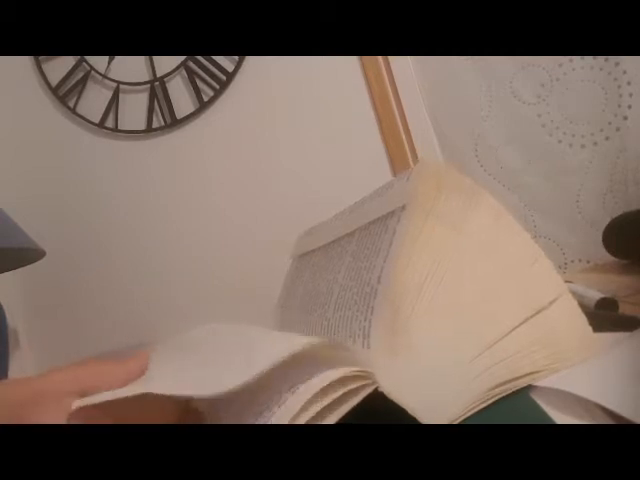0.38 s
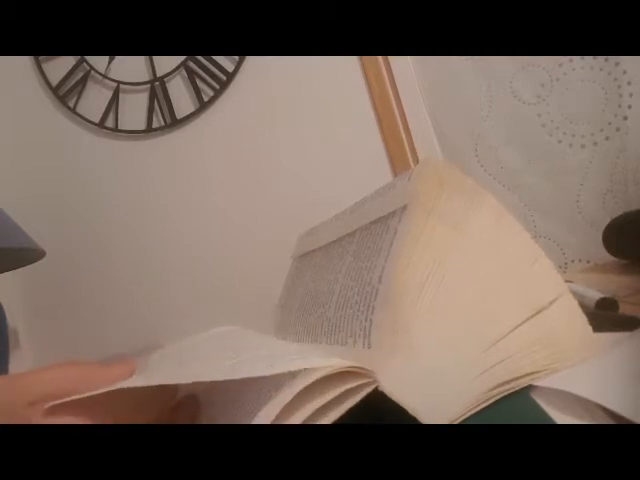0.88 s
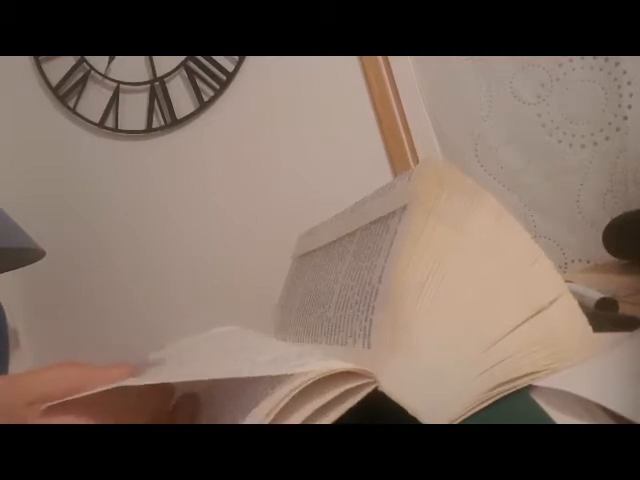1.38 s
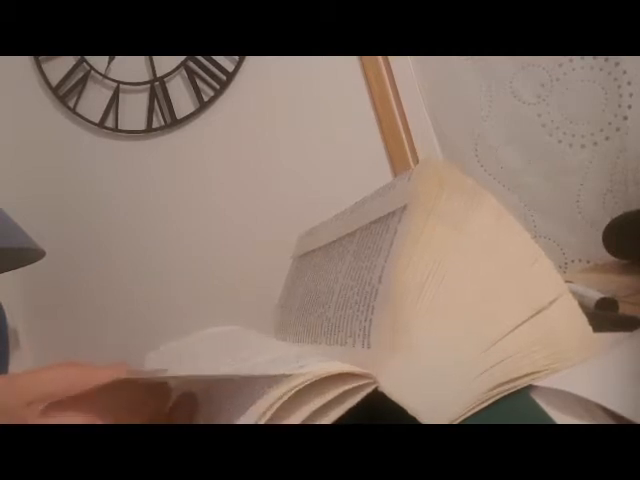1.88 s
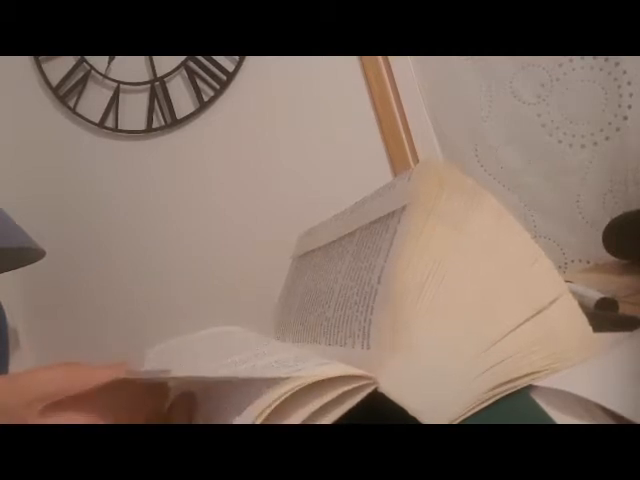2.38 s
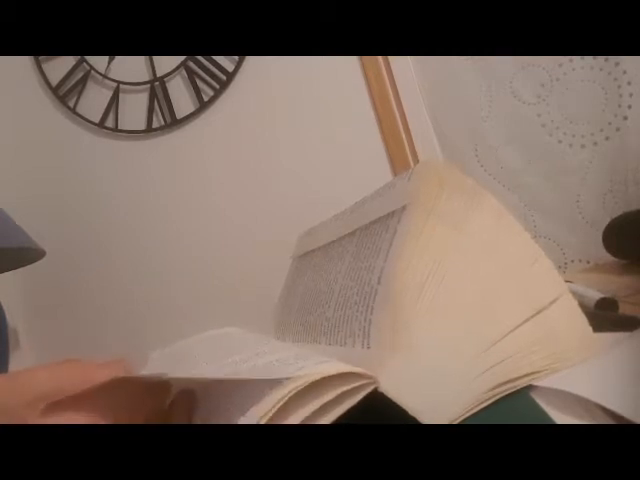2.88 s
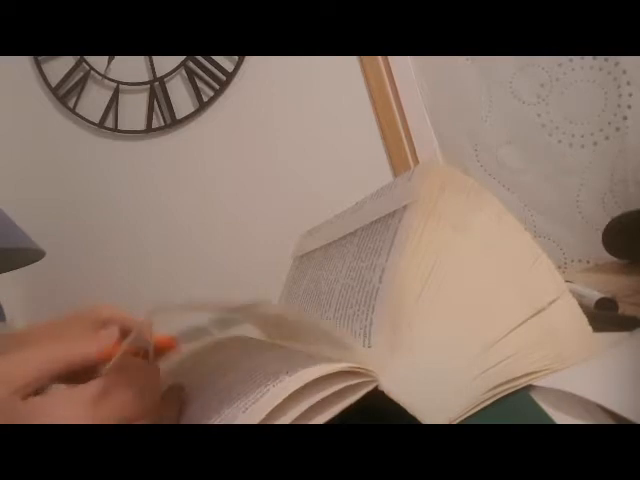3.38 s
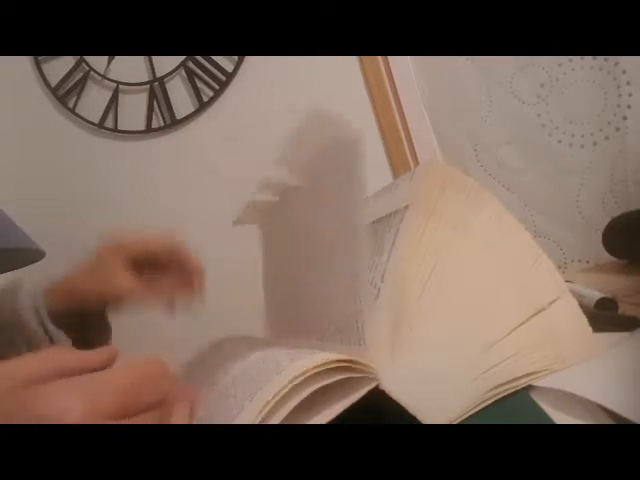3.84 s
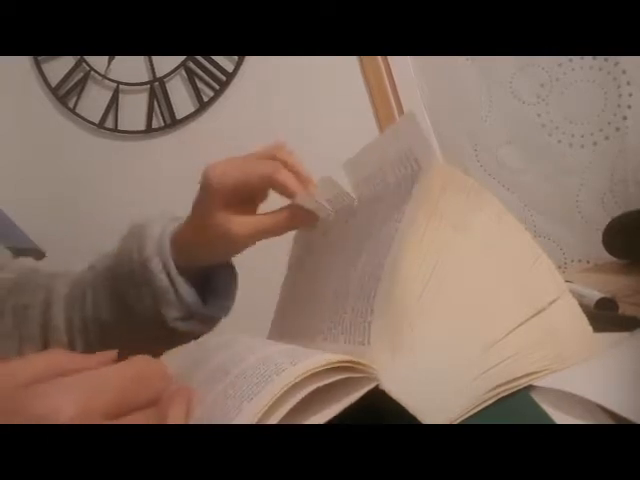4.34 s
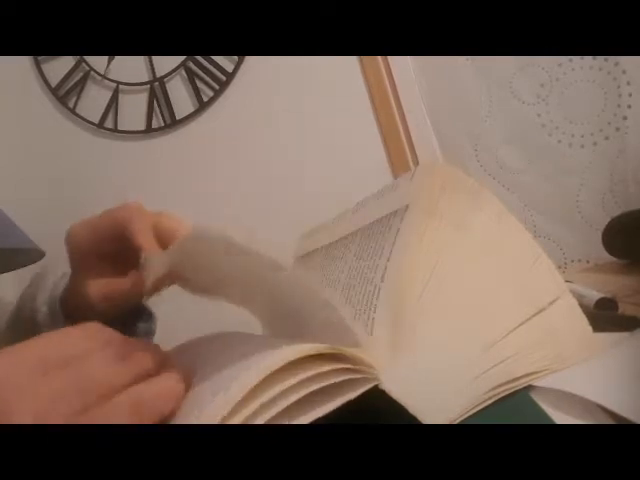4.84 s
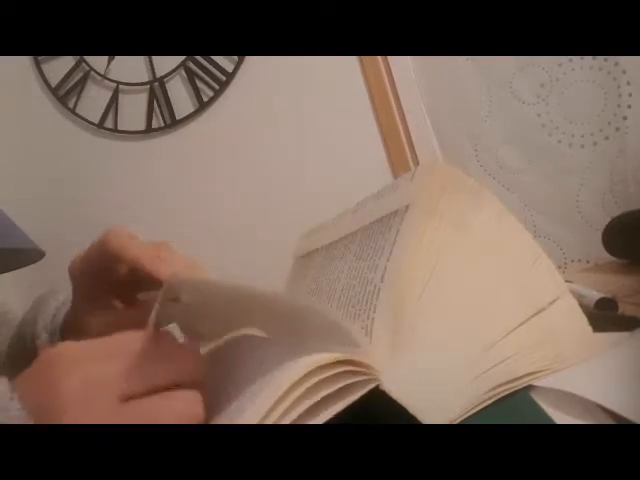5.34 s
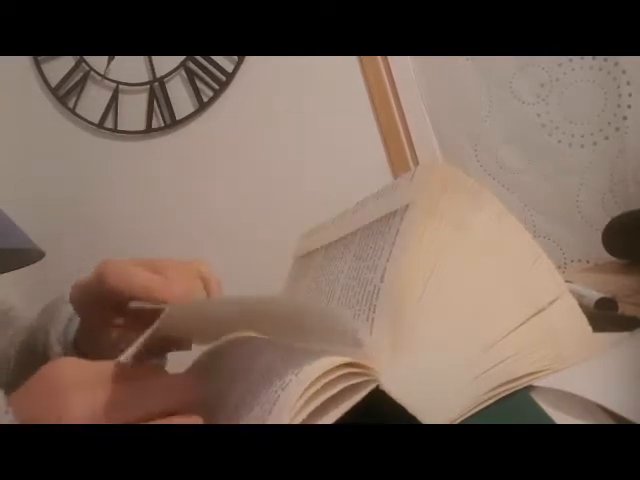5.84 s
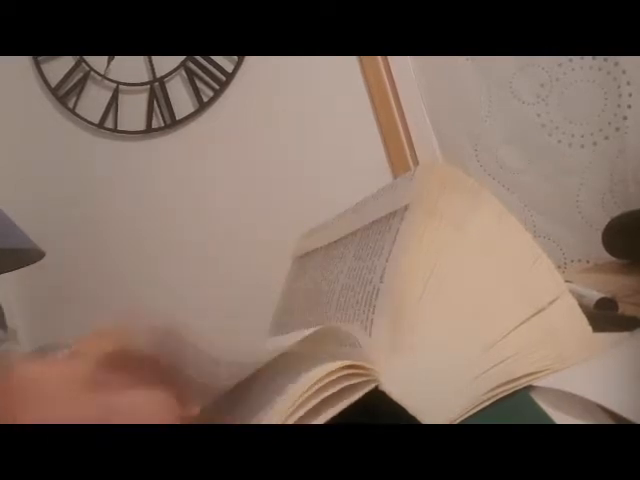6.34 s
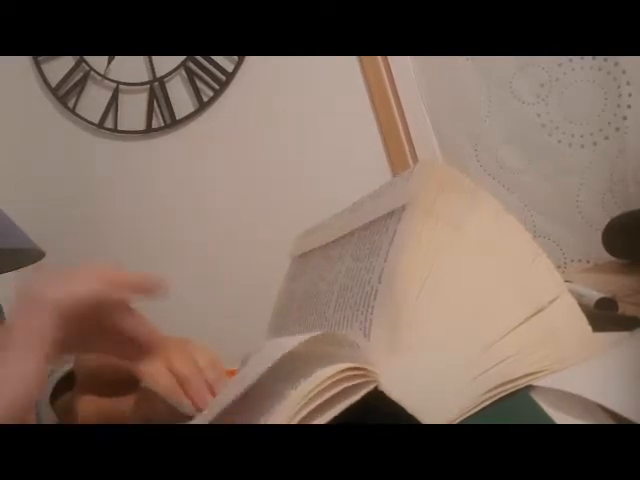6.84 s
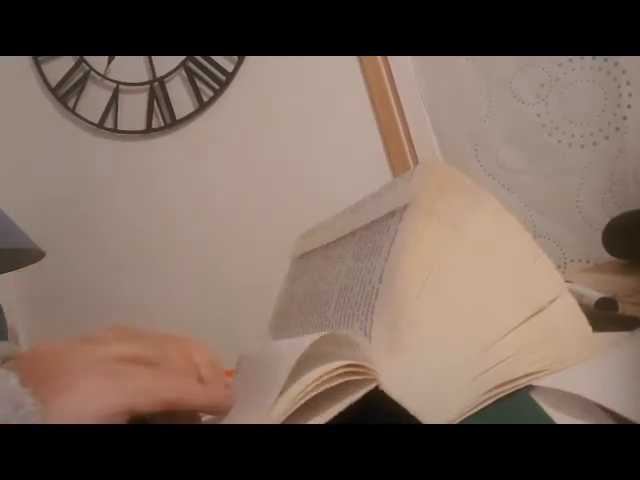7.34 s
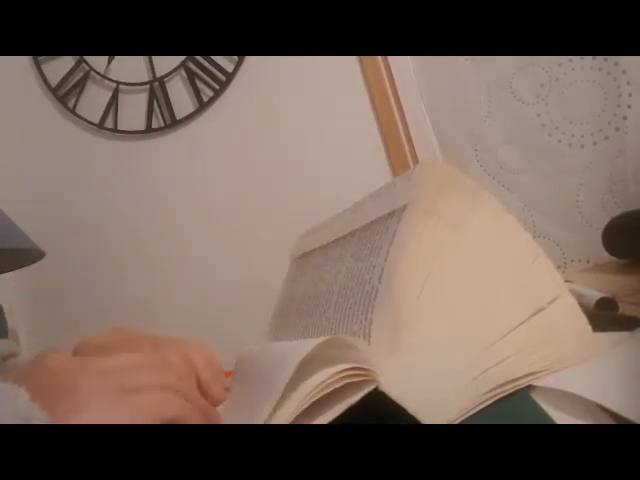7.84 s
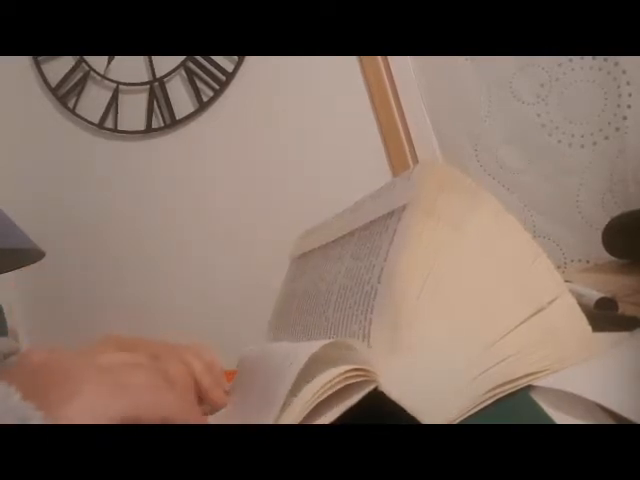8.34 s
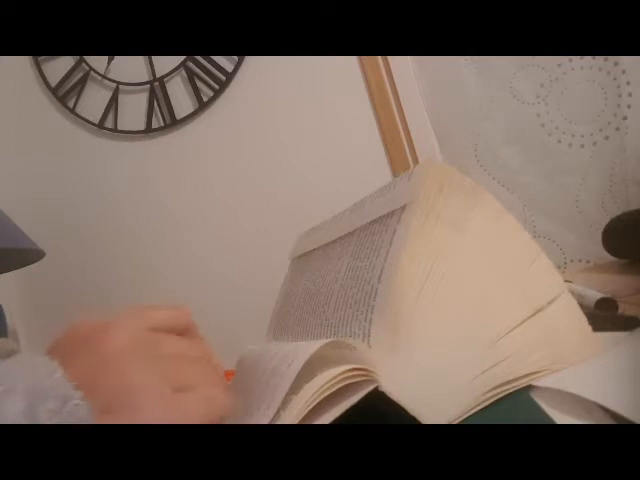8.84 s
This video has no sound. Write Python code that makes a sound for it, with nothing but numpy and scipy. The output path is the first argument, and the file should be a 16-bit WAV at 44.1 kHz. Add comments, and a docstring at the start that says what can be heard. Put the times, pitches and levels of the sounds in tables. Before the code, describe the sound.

Thin book pages crinkle, slide and snap under fingers in a quiet small room; scissors clatter once onto a desk midway.

```python
"""Hands cut, bend and fold a page of a thick book on a desk in a quiet small room, over steady hum and hiss.
From the start grains rub as sliding paper over a low murmur; slip clumps snap as creases, rasps drag, clicks crack.
From 1.2 s damped sines make soft ringing taps; from 1.8 s pushes and short shudders jolt the desk.
Near 3.7 s scissors land and bounce: ringing desk modes, dull knocks, ticks; handling resumes to 8.96 s.
One microphone feeds both channels alike."""
import sys
import numpy as np
from scipy import signal
from scipy.fft import rfft, irfft
from scipy.io import wavfile

SR = 44100
rng = np.random.default_rng(int(sys.argv[2]) if len(sys.argv) > 2 else 0)


def to_linear_factor(level_db):
    """Convert decibel levels (scalar or array-like) to linear amplitude factors."""
    exponent = np.asarray(level_db, float) / 20
    return 10 ** exponent


def generate_wav(sig):
    """Save sig (samples, or channels by samples) to the path in sys.argv[1] as 16-bit PCM at SR."""
    pcm = np.round(np.clip(np.atleast_2d(sig).T, -1, 1) * 32767).astype(np.int16)
    wavfile.write(sys.argv[1], SR, pcm)


N = 395136

# hum and hiss spectrum: hz, relative_db
ROOM_TONE = [(15, -44), (25, 1), (49, 1), (103, 6), (277, -8.5), (472, -13), (1140, -48), (2410, -27),
             (4500, -27.5), (9400, -28), (12600, -28.5), (14800, -31)]
# paper sliding under fingers: time_s, level_db, brightness_db, fullness_db
SLIDES = [(0, -61, -12, 15), (.07, -73.5, -16, 13), (.2, -71.5, -6, 2), (.33, -58, -10, 1),
          (.5, -50.5, -10.5, -2), (.66, -51.5, -25, -1), (.77, -75, -1.5, 5.5), (1.1, -77, -8, 9),
          (1.37, -74, 4, -1.5), (1.47, -68.5, 5, 2), (1.62, -80.5, 5, 3), (1.82, -76.5, 10, 10),
          (2.05, -76.5, 5, 7), (2.3, -72.5, 9, -6), (2.48, -75.5, 0, 12.5), (2.9, -70, -1, 6.5),
          (3.12, -57, -6.5, -1), (3.3, -66.5, -5.5, 12.5), (3.66, -69.5, -5, 14.5), (3.76, -63.5, 1, -1),
          (3.8, -41.5, -20, -19), (3.9, -60.5, -11, 17.5), (4.05, -72.5, -6.5, 11.5),
          (4.359, -78.5, -1.5, 6.5), (4.601, -70, 5.5, 3), (4.8, -68.5, 3.5, -1), (4.97, -67.5, 2.5, 4.5),
          (5.2, -61.5, 1.5, 8), (5.44, -60.5, -4.5, 15.5), (5.63, -75, 1, 11), (5.72, -58.5, -2, 8),
          (5.81, -71, 6, 5), (5.89, -53.5, 7, 7), (5.95, -63, 0, 9), (6.17, -55.5, 0.5, 1),
          (6.41, -53.5, -3, 6), (6.47, -65, 3, 4), (6.56, -57.5, 0, 0.5), (6.66, -59, -2.5, -3),
          (6.72, -66, 2, -5), (6.9, -61, -8, 0), (7.12, -68.5, 0, 1), (7.4, -67, -4, 9),
          (7.47, -74, -2, 10), (7.55, -55.5, -3.5, -15), (7.68, -54, -9, 4), (7.78, -69.5, 7, 14),
          (7.83, -71, 0, -13), (7.9, -60.5, -4, 3.5), (8.22, -62.5, -2, 9.5), (8.4, -66.5, -1.5, 6.5),
          (8.56, -75.5, 1.5, 7.5), (8.76, -52.5, -9, -4), (8.83, -74, 12, 1), (8.9, -55, -2, -14),
          (8.96, -74, 3, -10)]
# sliding bands (rustle, body, edge hiss, rasp): low_hz, high_hz
SLIDE_ZONES = [(986, 2056), (179, 790), (3860, 21600), (1850, 3480)]
# broad resonances of page and book: centre_hz, width_hz, lift_db
PAGE_RESONANCES = [(396, 231, 5), (637, 100, 1), (1404, 575, 4), (2700, 230, -0.5), (3500, 1400, -4),
                   (4600, 1200, 0.5), (8230, 3900, -3.5)]
# hands and scissors jolting the desk: start_s, level_db
THUMPS = [(1.802, -57), (1.947, -53), (2.091, -55), (2.177, -52), (2.233, -60), (2.695, -51), (3.14, -52),
          (3.222, -46), (3.449, -61.5), (3.696, -35.5), (3.785, -33.5), (4.387, -64), (4.63, -44),
          (4.658, -65), (4.719, -65), (4.93, -60), (5.041, -53), (5.159, -61), (5.25, -49), (5.376, -40.5),
          (5.739, -39), (5.832, -46.5), (5.88, -43), (6.008, -39), (6.084, -44.5), (6.245, -44),
          (6.396, -45), (6.827, -48), (7.04, -54), (7.145, -43), (7.199, -51), (7.271, -52), (7.342, -53),
          (7.623, -49), (7.72, -54), (8.264, -46), (8.592, -43)]
# creases snapping: time_s, rustle_db, edge_above_rustle_db, width_s, facet_hz
SNAPS = [(.1214, -57, -8, 0.028, 750), (.223, -56.5, -5.5, 0.036, 1300), (.4024, -54, -16, 0.016, 1220),
         (.46, -69, -2, 0.024, 2370), (.5014, -47, -17, 0.0082, 2500), (.5595, -51.5, -10, 0.0065, 2700),
         (.659, -59, -1.5, 0.022, 1480), (.7315, -60.5, -5, 0.0083, 630), (.945, -66, -1, 0.0098, 2500),
         (1.138, -56.5, -6, 0.0099, 4760), (1.178, -62, -8, 0.0097, 4460),
         (1.2815, -54.5, 0.5, 0.0053, 2380), (1.2902, -59, 2.5, 0.0024, 2210), (1.4, -58, -4, 0.0065, 1830),
         (1.417, -55.5, -5, 0.013, 4080), (1.456, -54, -3, 0.0047, 2260), (1.527, -60.5, -5, 0.0048, 3940),
         (1.5607, -51, -5.5, 0.0063, 2430), (1.601, -61.5, -1, 0.0082, 2650),
         (1.6865, -53.5, -4, 0.0043, 2650), (1.71, -56, -4, 0.014, 2580), (1.751, -42, -7.5, 0.0035, 2340),
         (1.78, -52, -5, 0.0032, 1980), (1.8037, -43.5, -7, 0.0045, 2630), (1.8125, -47, -8, 0.0081, 2200),
         (1.8254, -43, -4, 0.0033, 2140), (1.875, -69, -18, 0.0047, 890), (1.9565, -43, -9, 0.0072, 2530),
         (1.981, -65, 8, 0.0068, 2400), (2.1025, -40, -7.5, 0.0036, 1480), (2.116, -54, -3, 0.0014, 2280),
         (2.175, -47.5, -1, 0.0026, 1800), (2.1845, -43.5, -11, 0.0052, 2300),
         (2.1937, -54.5, 1.5, 0.0019, 2350), (2.2265, -56, -3, .003, 1500), (2.231, -51, -1, 0.0034, 2210),
         (2.27, -47.5, -1, 0.0029, 1990), (2.2755, -43, -5, 0.0023, 510), (2.343, -50.5, -10, 0.014, 1970),
         (2.475, -68, -39, 0.0035, 1800), (2.5206, -54.5, -3.5, 0.0035, 1590),
         (2.5594, -50.5, 2.5, 0.0083, 1540), (2.5884, -48, 0, 0.0073, 2860),
         (2.7031, -39, -2, 0.0096, 2520), (2.7188, -43, -29, 0.012, 2100), (2.967, -52.5, -11, 0.014, 2300),
         (3.1304, -48, -3, 0.015, 1620), (3.1394, -28.5, -4, 0.0026, 1890),
         (3.1513, -40, -4.5, 0.0048, 1610), (3.4615, -46, -35, .004, 1160), (3.841, -56, -14, 0.066, 400),
         (4.625, -65, -10, 0.022, 232), (4.6396, -55.5, -14, 0.0092, 4460),
         (4.6625, -48, -30, 0.0083, 1920), (4.73, -45, -25, 0.0091, 1150), (4.7595, -50, -4, 0.0041, 2300),
         (4.767, -50, -6, 0.0019, 1890), (4.7795, -47, -2.5, 0.0061, 2300),
         (5.0495, -43.5, -3.5, 0.0074, 1550), (5.091, -56, -47, 0.0058, 1920),
         (5.1438, -55.5, -32, 0.0081, 2030), (5.2255, -49, 2.5, 0.0098, 1000),
         (5.2659, -51, -1, 0.005, 6500), (5.348, -59, -14, 0.0073, 950), (5.358, -51.5, -30, 0.014, 1280),
         (5.3688, -50.5, 1.5, 0.016, 520), (5.389, -46, -12, 0.0018, 1400),
         (5.487, -55.5, -3.5, 0.049, 1370), (5.5766, -57, -5, 0.015, 5760), (5.717, -70, 9, 0.059, 460),
         (5.7317, -54, -6, 0.013, 1050), (5.7499, -44, -12, 0.0082, 1110), (5.7599, -48, -15, 0.0018, 1090),
         (5.7724, -46.5, -7, 0.0038, 1280), (5.8485, -42.5, -15, 0.01, 1170),
         (5.887, -44, -3.5, 0.01, 5860), (5.906, -85, 7, 0.015, 450), (6.005, -46, -10, 0.021, 1070),
         (6.0216, -46.5, -1.5, 0.019, 2150), (6.0535, -57, -22, 0.012, 1110),
         (6.1035, -37.5, -13, 0.0084, 1400), (6.24, -48, -9, 0.0089, 1950),
         (6.2565, -41.5, -1.5, 0.0055, 1110), (6.3063, -54, 3, 0.0028, 3720),
         (6.3305, -45.5, -2, 0.0064, 2430), (6.377, -54.5, -3, 0.023, 2040), (6.402, -49, -1, 0.01, 5500),
         (6.5264, -56, -14, 0.015, 1330), (6.7936, -47.5, -4.5, 0.016, 4340),
         (6.8392, -34.5, -13.5, 0.0031, 3240), (6.9364, -53, -11, 0.0048, 2210),
         (7.0103, -58, -14, 0.018, 2280), (7.1796, -47, -4, 0.0093, 5000),
         (7.2121, -46.5, -12, 0.0079, 1560), (7.2524, -45.5, -12, 0.0049, 1330),
         (7.26, -53, -20, 0.0022, 1500), (7.289, -54.5, 0.5, 0.005, 1700), (7.34, -52.5, -7, 0.013, 744),
         (7.39, -53, -0.5, 0.014, 2420), (7.5184, -55, -12, 0.02, 764), (7.5608, -80, -5, .016, 2840),
         (7.649, -55, -18, 0.0046, 1300), (7.7287, -53.5, -9, 0.027, 870), (7.7736, -52.5, -9, 0.0049, 635),
         (7.8461, -54.5, -6.5, 0.01, 780), (8.006, -58, -3, 0.014, 664), (8.0386, -64.5, 3, 0.014, 430),
         (8.1286, -73, -18, 0.0048, 450), (8.2134, -55.5, -4, 0.024, 2540), (8.281, -51, -4.5, 0.013, 746),
         (8.595, -66, -1, 0.0022, 5000), (8.6015, -43, 6, 0.002, 9300), (8.6035, -32.5, 1.5, 0.003, 4300),
         (8.6075, -32, -5, 0.0036, 1400), (8.6924, -59, -46, 0.012, 2640), (8.76, -70, 14, 0.013, 2750),
         (8.87, -48, -6.5, 0.013, 5060)]
# page bands (rustle, body, edge): low_hz, high_hz
PAGE_ZONES = [(902, 3700), (179, 880), (3820, 10100)]
# fingertip dragging over the sheet: start_s, length_s, level_db, pitch_hz, width_octaves
DRAGS = [(0.182, 0.043, -53, 1190, 1.15), (0.283, 0.13, -69, 2540, 0.54), (0.425, 0.19, -67.5, 4600, 0.35),
         (0.435, 0.19, -59, 2750, 0.24), (.64, 0.04, -61, 2900, 0.5), (2.97, 0.075, -63, 2300, .3),
         (2.97, 0.075, -66.5, 4060, 0.35), (3.333, 0.12, -73, 4500, .7), (3.155, 0.085, -66, 3500, 1.2),
         (5.207, 0.023, -50.5, 5250, 0.31), (5.339, 0.045, -46.5, 810, 1.3),
         (5.724, 0.021, -47.5, 1100, 0.56), (6.324, .06, -58, 2300, 1.3), (6.573, 0.12, -61.5, 2860, .7),
         (7.53, 0.076, -59, 2530, 0.43), (7.537, .06, -67, 3500, 0.13), (7.634, 0.13, -65, 2700, .6),
         (7.845, .05, -64, 3500, 1.6), (7.925, .06, -72, 2800, .4), (8.193, 0.072, -51.5, 780, .6),
         (8.732, 0.095, -66, 3000, 1.4)]
# single sharp clicks, creases cracking and near 3.78 s the scissors' ticks: start_s, level_db, pitch_hz
CLICKS = [(.392, -38, 2400), (.4968, -46, 2000), (0.5157, -38, 2800), (0.523, -38, 1800),
          (.7305, -50, 4000), (.748, -49, 4000), (1.281, -49, 2600), (1.7778, -32, 2210),
          (1.803, -47, 2200), (1.959, -47, 2200), (2.095, -33.5, 1900), (2.0984, -35, 2200),
          (2.103, -39, 1900), (2.1144, -36, 1800), (2.174, -55, 1800), (2.1786, -46, 1500),
          (2.185, -46, 2390), (2.1935, -35, 2300), (2.2765, -33.5, 1110), (3.6613, -43, 900),
          (3.781, -23.5, 3020), (3.7877, -21, 1810), (4.662, -55, 2200), (5.0447, -27, 5000),
          (5.049, -35, 4000), (5.258, -40, 6000), (5.7727, -51, 3000), (5.87, -29, 4000),
          (6.2551, -28, 3020), (6.3068, -34, 4500), (6.326, -39, 2000), (6.402, -40, 5000),
          (7.8447, -57, 2500), (8.007, -44, 2500), (8.822, -42, 2500)]
# soft ringing taps, fingertips on the page and near 3.75 s the scissors' dull knocks:
# start_s, level_db, pitch_hz, ring_t60_s, settling_s
TAPS = [(1.2045, -45, 520, 0.11, 0.0018), (3.4523, -40, 710, 0.045, .011), (3.7527, -35, 970, .03, 0.0034),
        (3.7812, -28, 620, 0.015, .002), (3.7873, -25.5, 650, 0.021, .002), (4.396, -48, 526, 0.043, 0.004),
        (4.4, -39.5, 570, 0.042, 0.0083), (4.66, -39, 520, 0.011, 0.013),
        (4.7222, -37.5, 455, 0.035, 0.005), (4.758, -44, 726, 0.037, 0.004),
        (5.337, -38, 800, 0.011, 0.0033), (5.8442, -35.5, 1130, 0.024, 0.0073),
        (6.097, -41, 870, 0.011, 0.0069), (6.175, -36.5, 1170, 0.0072, 0.0018),
        (7.1553, -30.5, 774, 0.012, 0.00526), (7.2078, -33.5, 665, 0.023, 0.0078),
        (7.286, -28, 520, 0.0064, 0.0083), (7.351, -38.5, 455, 0.011, 0.0016),
        (7.635, -35.5, 650, 0.02, 0.0046), (8.038, -51, 420, .03, 0.0026), (8.125, -51, 400, 0.027, 0.0027),
        (8.278, -41, 685, 0.038, 0.004), (8.603, -37, 197, .06, 0.0062)]
# overtones of a tap: pitch_multiple, level_db, ring_time_share
TAP_OVERTONES = [(.55, -21.5, 1.1), (1.018, -0.8, 0.75), (1.25, -15.5, 0.68), (1.7, -2.5, 0.22),
                 (2.6, -16.5, 0.15), (3.7, -35, 0.19)]
# light knocks of a hand or tool on the desk: start_s, level_db, tick_db
KNOCKS = [(3.453, -38.5, -78), (4.3968, -45, -56)]
# scissors landing and bouncing on the desk: start_s, level_db, tick_db
DROPS = [(3.6615, -58, -58), (3.6906, -20.5, -43), (3.7527, -25, -45), (3.781, -20, -29),
         (3.7877, -19.5, -47)]
# desk top modes: mode_hz, level_db, t60_s
DESK_MODES = [(84, -0.5, 0.44), (126, -8, 0.53), (331.5, -5, 0.37), (360, -4.5, 0.61), (433, -10, 0.26),
              (400, 6.5, 0.028), (486, -10, 0.38), (520, -1, 0.3), (587, 8, 0.049), (640, -2.5, 0.12),
              (780, 11, 0.029), (863, 0, 0.057), (942, -0.5, 0.22), (939, 7, 0.082), (1170, -15, 0.057),
              (1400, -4, 0.055), (1500, -11, 0.2), (1830, -11, 0.1), (2300, 16, 0.0017)]


def rms_one(x):
    """Scale to rms 1."""
    return x / np.sqrt(np.mean(x ** 2) + 1e-20)


def in_time(rows):
    """Columns of a curve table, one value a sample."""
    time_s, *columns = np.transpose(rows)
    return [np.interp(np.arange(N) / SR, time_s, column) for column in columns]


def band(x, low_hz, high_hz, order=2):
    """Causal band-pass."""
    edges_hz = [max(low_hz, 10), min(high_hz, .45 * SR)]
    return signal.sosfilt(signal.butter(order, edges_hz, "band", fs=SR, output="sos"), x)


def drift(rate_hz):
    """Slow chance with spread 1: noise through two equal poles, drawn every 40 samples."""
    r = np.exp(-80 * np.pi * rate_hz / SR)
    noise = rng.standard_normal(N // 40 + 2002)
    slow = signal.lfilter([1], [1, -2 * r, r * r], noise)[2000:]   # settled part
    return np.interp(np.arange(N) / 40, np.arange(len(slow)), rms_one(slow))


def ring(clicks, hz, t60_s):
    """Two-pole resonator: a unit click starts a decaying sine of height 1."""
    r, w = to_linear_factor(-60 / (t60_s * SR)), 2 * np.pi * hz / SR
    return signal.lfilter([0, np.sin(w)], [1, -2 * r * np.cos(w), r * r], clicks + 1e-18)


def grains(per_s, spread_db, smooth):
    """Fibre slips of uneven size plus a power share of smooth friction noise; rms 1."""
    sizes = to_linear_factor(spread_db * np.minimum(rng.exponential(1, N), 4)) * rng.choice([-1, 1], N)
    slips = rms_one(sizes * (rng.random(N) < per_s / SR))
    smooth = np.clip(smooth, 0, 1)
    return np.sqrt(1 - smooth) * slips + np.sqrt(smooth) * rng.standard_normal(N)


def lift(x, hz, width_hz, lift_db):
    """One resonance raised out of a sound."""
    r = np.exp(-np.pi * width_hz / SR)
    a = [1, -2 * r * np.cos(2 * np.pi * np.clip(hz, 50, .45 * SR) / SR), r * r]
    resonance = signal.lfilter([(1 - r * r) / 2, 0, (r * r - 1) / 2], a, x)
    return x + (to_linear_factor(lift_db) - 1) * resonance


def through_page(x):
    """The fixed resonances of page and book."""
    for hz, width_hz, lift_db in PAGE_RESONANCES:
        x = lift(x, hz, width_hz, lift_db)
    return x


def zones(drive, levels, edges_hz):
    """Weight and band-limit the drive per zone; a level is the rms of its zone."""
    return sum(band(level * drive, low, high, order=3) / np.sqrt(2 * (high - low) / SR)
               for level, (low, high) in zip(levels, edges_hz))


def room_tone():
    """Steady hum and hiss: noise of a fixed spectrum, wavering slightly."""
    hz = np.maximum(np.fft.rfftfreq(N, 1 / SR), 1)
    table_hz, table_db = np.transpose(ROOM_TONE)
    colour = to_linear_factor(np.interp(np.log(hz), np.log(table_hz), table_db))
    noise = irfft(rfft(rng.standard_normal(N)) * colour, N)
    return to_linear_factor(-69 + 0.11 * drift(8.6)) * rms_one(noise)


def rubbing():
    """Sliding paper catches and lets go: zones flutter together, each a little on its own."""
    slide_db, bright_db, full_db = in_time(SLIDES)
    catch_db = 0.98 * drift(24)
    # per zone: offset_db, share of brightness, share of fullness
    mix = [(-6.5, 0.095, 0.13), (-7, 0.44, 0.76), (-3, 0.85, 0.15), (-3, 0.3, 0.022)]
    levels = []
    for offset_db, bright, full in mix:
        zone_db = slide_db + offset_db + bright * bright_db + full * full_db
        levels.append(to_linear_factor(zone_db + catch_db + 1.48 * drift(34.5)))
    return through_page(zones(grains(1500, spread_db=2.5, smooth=0.35), levels, SLIDE_ZONES))


def desk_rumble():
    """A low murmur follows the sliding throughout; each jolt is one soft push and a short shudder."""
    t, slide_db = np.arange(N) / SR, in_time(SLIDES)[0]
    rise_s, t60_s, push_s = 0.0021, 0.12, 0.00278
    level = to_linear_factor(-75.5 + 0.16 * (slide_db - slide_db.mean()) + 6.0 * drift(6.7))
    pushes = np.zeros(N)
    for start_s, level_db in THUMPS:
        at = slice(round(start_s * SR), round((start_s + .4) * SR))
        age_s = t[at] - t[at][0]
        level[at] += to_linear_factor(level_db - 4.0 - 60 * age_s / t60_s) * (1 - np.exp(-age_s / rise_s))
        pushes[at] -= to_linear_factor(level_db + 7.5) * np.exp(-(age_s / push_s - 3.2) ** 2)
    return zones(rng.standard_normal(N), [level], [(62, 203.0)]) + band(pushes, 85, 210)


def crinkles(count=110):
    """Small snaps at random moments, their level following the sliding; rows like SNAPS."""
    luck, time_s = rng.standard_normal((count, 4)), rng.uniform(0, N / SR, count)
    slide_s, slide_db = np.transpose(SLIDES)[:2]
    rustle_db = np.interp(time_s, slide_s, slide_db) - 6 + 5 * luck[:, 0]
    edge_db = -10.5 + 4 * luck[:, 1]
    width_s = 0.0066 * np.exp(.5 * luck[:, 2])
    facet_hz = 2180 * np.exp(.5 * luck[:, 3])
    return np.transpose([time_s, rustle_db, edge_db, width_s, facet_hz])


def snapping():
    """A crease lets off a clump of slips that builds up, peaks and dies, ringing at its facet's pitch."""
    drive, out = grains(1800, spread_db=2.2, smooth=0.15), np.zeros(N)
    rows = [*SNAPS, *crinkles()]
    signs = rng.choice([-1, 1], len(rows))
    # shares of the width per zone; the low body flaps on longest
    dying, building = np.array([[.65], [.85], [.55]]), np.array([[.74], [.74], [1.1]])
    for (time_s, rustle_db, bright_db, width_s, facet_hz), sign in zip(rows, signs):
        edge_db = rustle_db + bright_db
        # body sounds more in dull snaps and under low, large facets
        body_db = rustle_db - 1.5 - 0.2675 * bright_db - 1.5 * np.log2(facet_hz / 1000)
        at = np.arange(max(round((time_s - .05) * SR), 0), min(round((time_s + 0.094) * SR), N))
        width_s = np.clip(width_s, .002, .06)
        dull = 1 / (1.0 + np.exp((17.0 + edge_db - body_db) / 10.0))   # toward 0 for a bright crackle
        # short dull snaps break at once, long bright ones swell
        sudden = (0.5 + 1.1 * dull) * np.exp(-width_s / 0.021)
        t = (at / SR - time_s + 0.0013) / width_s + .25 * sudden   # in widths
        distance = np.where(t > 0, t / dying, -t / (building * (1 - sudden) ** 2))
        shape_db = -6 * distance ** 0.8
        levels = to_linear_factor(np.array([[rustle_db], [body_db], [edge_db]]) - 3.5 + shape_db)
        # dull snaps lose the top of their rustle
        low_hz, high_hz = PAGE_ZONES[0]
        edges_hz = [(low_hz, high_hz * to_linear_factor(.1 * np.clip(bright_db, -40, 0))), *PAGE_ZONES[1:]]
        slips = drive[at]
        slips[np.argmax(t > 0)] = sign * 0.44 * sudden   # the first break is one big slip
        facet_width_hz = (0.16 + 0.17 * np.exp(-width_s / 0.006)) * facet_hz   # short snaps are dry
        out[at] += lift(zones(slips, levels, edges_hz), facet_hz, facet_width_hz, 9.03)
    return through_page(out)


def dragging():
    """Each drag catches quickly and fades as a grainy rasp around its pitch."""
    out, catch_share = np.zeros(N), 0.23
    drive = to_linear_factor(1.5 * drift(49)) * grains(1800, spread_db=0.0, smooth=0.39)
    for start_s, length_s, level_db, pitch_hz, octaves in DRAGS:
        at = slice(round(start_s * SR), round((start_s + length_s) * SR))
        done = np.linspace(0, 1, len(out[at]))
        swell = np.minimum(done / catch_share, 1) * np.sqrt(1 - done ** 2)
        spread = 2 ** (max(octaves, .1) / 2)
        out[at] += zones(drive[at], [to_linear_factor(level_db) * swell], [(pitch_hz / spread, pitch_hz * spread)])
    return out


def clicking():
    """Each crease crack or scissors' tick is one impulse that rings for a few cycles."""
    out, click = np.zeros(N), np.eye(1, round(.02 * SR))[0]
    for (start_s, level_db, pitch_hz), sign in zip(CLICKS, rng.choice([-1, 1], len(CLICKS))):
        start = round(start_s * SR)
        out[start:start + len(click)] += sign * to_linear_factor(level_db) * ring(click, pitch_hz, 5.4 / pitch_hz)
    return out


def tapping(count=5):
    """A first contact, then a few weaker ones as it settles, all ringing the same damped overtones."""
    out, luck = np.zeros(N), rng.random((len(TAPS), 3, count))
    for (start_s, level_db, pitch_hz, t60_s, settling_s), (when, size, side) in zip(TAPS, luck):
        clicks = np.zeros(round(.2 * SR))
        later = 1 + (when * max(settling_s, 0) * SR).astype(int)
        clicks[later] = np.sign(side - .5) * to_linear_factor(level_db - 3.5 + 3 * (2 * size - 2))
        clicks[0] = -to_linear_factor(level_db)
        start = round(start_s * SR)
        out[start:start + len(clicks)] += sum(to_linear_factor(overtone_db) * ring(clicks, k * pitch_hz, share * t60_s)
                                              for k, overtone_db, share in TAP_OVERTONES)
    return signal.sosfilt(signal.butter(4, 1940, fs=SR, output="sos"), out + 1e-18)


def scissors():
    """Every bounce or knock gives a bright tick and strikes each desk mode with a strength of its own."""
    blows = DROPS + KNOCKS
    at = [round(row[0] * SR) for row in blows]
    _, level_db, tick_db = np.transpose(blows)
    luck_db, out = rng.normal(0, 2, (len(blows), len(DESK_MODES))), np.zeros(N)
    # the desk's ring wavers at random, more as each blow ages
    waver_db, waver_hz, waver_onset_s = 5, 45, 0.0086
    marks = np.zeros(N)
    marks[at] = at
    since_blow = np.arange(N) - np.maximum.accumulate(marks)
    onset = 1 - np.exp(-since_blow / (waver_onset_s * SR))
    for k, (mode_hz, mode_db, t60_s) in enumerate(DESK_MODES):
        clicks = np.zeros(N)
        # neighbouring modes swing opposite ways
        clicks[at] = (-1) ** k * to_linear_factor(level_db + mode_db - 17.5 + luck_db[:, k])
        waver = drift(waver_hz * min(mode_hz / 300, 1)) - 1.0
        out += to_linear_factor(waver_db * onset * waver) * ring(clicks, mode_hz, t60_s)
    ticks = np.zeros(N)
    ticks[at] = to_linear_factor(tick_db + 4.5)
    decay = signal.lfilter([1], [1, -to_linear_factor(-60 / (0.0091 * SR))], ticks + 1e-18)   # t60 9.1 ms
    burst = decay * rng.standard_normal(N)
    return band(out, 60, 2300) + band(burst, 1300, 8100)


def room(x):
    """Dense small echoes after a short gap; the treble dies first."""
    t60_s, treble_t60_s, gap_s, wall_cut_hz = 0.32, 0.19, 0.0045, 2850
    age_s = np.arange(round(.45 * SR)) / SR
    noise = rng.standard_normal(len(age_s))
    low = signal.sosfilt(signal.butter(2, wall_cut_hz, fs=SR, output="sos"), noise)
    echoes = low * to_linear_factor(-60 * age_s / t60_s) + (noise - low) * to_linear_factor(-60 * age_s / treble_t60_s)
    echoes *= 1 - np.exp(-(age_s / gap_s) ** 2)
    return signal.oaconvolve(x, echoes / np.sqrt(np.sum(echoes ** 2)))[:N]


def scene():
    """One microphone, deaf to deep bass and dull above its cut, feeds both channels; hum and hiss join after."""
    hits = snapping() + clicking() + tapping() + scissors()
    air = hits + to_linear_factor(-12.5) * room(hits) + rubbing() + dragging() + desk_rumble()
    mono = band(air, 54.6, 9380, order=4) + room_tone()
    return np.array([mono, mono])


def top_cut(x):
    """Nothing passes above the cut-off."""
    return signal.sosfilt(signal.butter(12, 14600, fs=SR, output="sos"), x)


def record(dry):
    """Adds a small steady offset."""
    mix = dry - .0005
    return top_cut(mix)


dry = scene()
out = record(dry)
generate_wav(out)
```